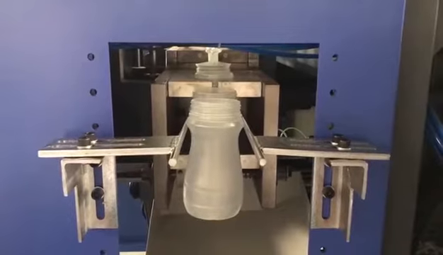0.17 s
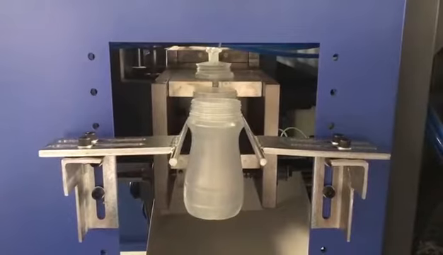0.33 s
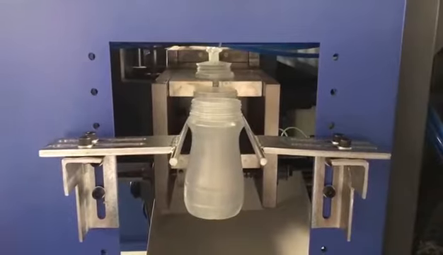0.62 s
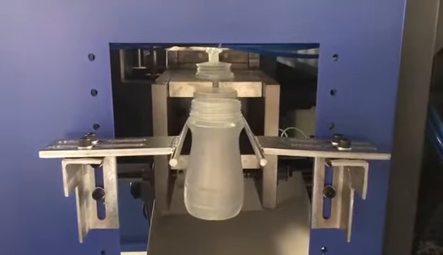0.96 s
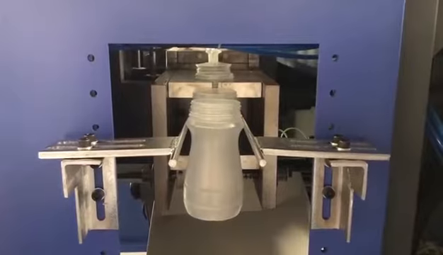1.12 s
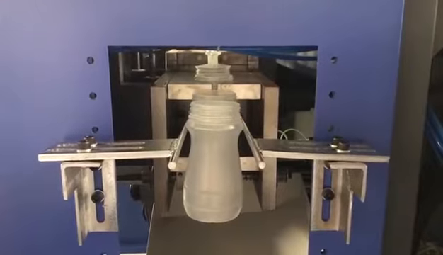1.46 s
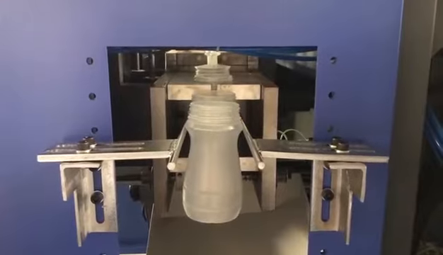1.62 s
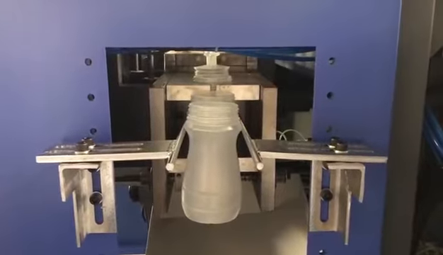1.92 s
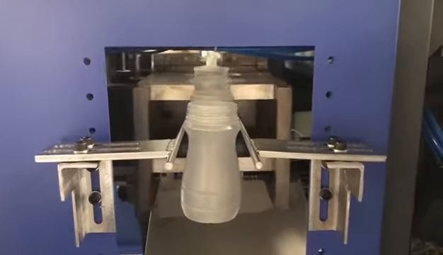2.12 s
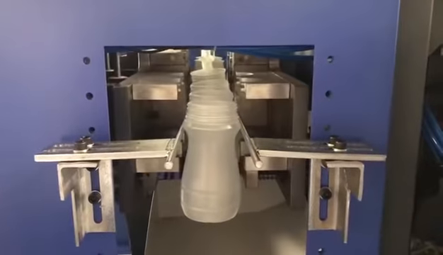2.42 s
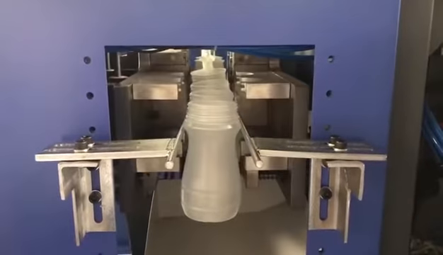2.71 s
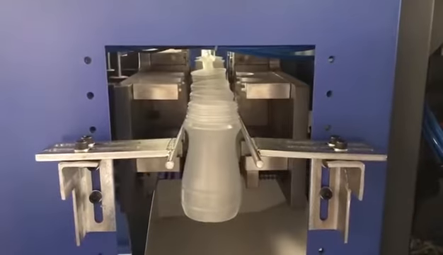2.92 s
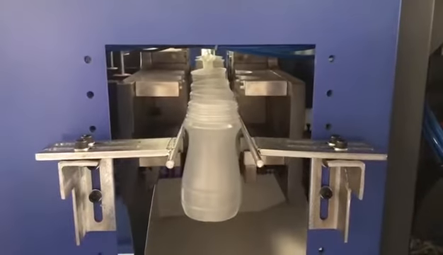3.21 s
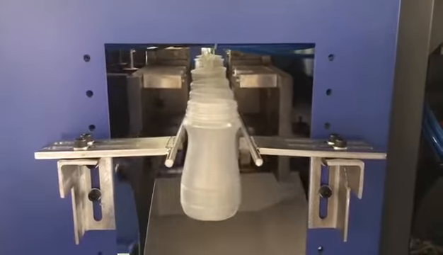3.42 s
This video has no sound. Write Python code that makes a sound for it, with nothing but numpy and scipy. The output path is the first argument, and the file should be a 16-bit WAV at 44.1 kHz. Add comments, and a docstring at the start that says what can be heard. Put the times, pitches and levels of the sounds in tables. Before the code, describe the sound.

Close, mono pickup of a factory moulding machine: constant thin whine over low hum and airy fan, one sharp clack, a brief air vent, a sliding rush into a hard metal slam, then dull knocks and rumble.

```python
"""A motor drive whines steadily over pump hum and fan noise: a blow moulding machine, close up in a hall.
A soft, breathy ring sings along. A latch clacks with a puff of air, a valve ticks and vents, the carriage
slides and slams into its stop, then the mould knocks and the mechanism rumbles on to a late last knock.
Whine and hum are wavering sines; fan, air, slide and rumble are coloured noise. Each blow is a hard
contact and a cluster of small ones that ring a steel part."""
import sys
import numpy as np
from scipy import signal
from scipy.fft import rfft, irfft
from scipy.io import wavfile
from scipy.ndimage import uniform_filter1d, minimum_filter1d

SR = 44100
rng = np.random.default_rng(int(sys.argv[2]) if len(sys.argv) > 2 else 0)


def output_pcm(signal):
    """Save a mono or channel-first signal as 16-bit PCM at the path in sys.argv[1].

    Samples are clipped to [-1, 1] before scaling.
    """
    pcm = np.clip(np.atleast_2d(signal).T, -1, 1) * 32767
    wavfile.write(sys.argv[1], SR, np.round(pcm).astype(np.int16))


N = 157437  # length in samples
TOP_HZ = 7520

WHINE_HZ, WHINE_DB = 4065.2, 1  # centre of the whine, and a trim on all its lines
WHINE_DRIFT, WHINE_FLUTTER_DB = 0.000098, 0.37  # drift as a fraction of the pitch
HUM_DRIFT, HUM_FLUTTER_DB = 0.001483, 1.6
# Drive whine and its sidebands. Each row: offset from the whine's centre in Hz, level in dB before the trim.
WHINE_LINES = [(-131, -55.5), (-65.5, -52.5), (0, -34.5), (65.5, -52.5), (121, -55), (174.5, -61),
               (240.5, -59.5), (361, -62)]
# Pump and motor hum. Each row: frequency in Hz, level in dB.
HUM_LINES = [(151, -56.5), (300.5, -46), (366.3, -40), (551, -56), (652, -54.5), (1787, -56), (3149, -59.5),
             (3386, -56), (5965, -60), (6095, -59.5), (7280, -61)]


def motors():
    """Drive whine with shaft and mains sidebands that drift together; hum lines that waver separately."""
    drift = WHINE_DRIFT * walk(6.7)
    whine = sum(tone(WHINE_HZ + offset, db + WHINE_DB, drift, WHINE_FLUTTER_DB)
                for offset, db in WHINE_LINES)
    hum = sum(tone(hz, db, HUM_DRIFT * walk(20), HUM_FLUTTER_DB) for hz, db in HUM_LINES)
    return whine + hum


# Modes of each struck steel part, listed by part. Each row: frequency in Hz, peak in dB above the broad body.
PART_MODES = { "latch": [(151, 4.5), (1276, 7), (1550, 4), (1895, 6), (2070, 6), (5997, 5)],
              "valve": [(4850, 4)], "stop": [(242, 5), (325, 10), (425, 12), (655, 7), (810, 11.5),
              (1540, 6), (1669, 9), (1771, 5), (2024, 8), (2280, 9), (2976, 11), (3548, 8)],
              "mould": [(323, 9), (624, 10), (1200, 8), (1550, 7), (2280, 6), (2610, 6)]}


def ring(part):
    """Gain over frequency of a steel part's modes; higher ones are wider, so they die sooner."""
    return modes([(hz, 20 + .008 * hz, db) for hz, db in PART_MODES[part]])


RISE_S, BASS_LAG_S = .002, .0015
TAIL_DB, TAIL_S = -22, .055  # hall tail: level against the blow, fall time constant
CONTACTS_PER_S, CONTACT_SHARE = 1400, 0.51  # small contacts; their share of the rattle, the rest is noise
STRIKE_SHARE = .1  # share of a blow's energy in its first hard contact


def blow_force(start, hold, fall):
    """One hard contact, then a rattle of small contacts and noise that falls into a short hall tail."""
    contacts = unit((rng.random(N) < CONTACTS_PER_S / SR) * np.sign(rng.standard_normal(N)))
    grit = rng.standard_normal(N)
    rattle = np.sqrt(CONTACT_SHARE) * contacts + np.sqrt(1 - CONTACT_SHARE) * grit
    tail = undb(TAIL_DB) * envelope(start, RISE_S, hold, TAIL_S)
    env = envelope(start, RISE_S, hold, fall) + tail
    strike = 1. * (np.arange(N) == int((start + RISE_S) * SR))
    force = np.sqrt(STRIKE_SHARE) * unit(strike) + np.sqrt(1 - STRIKE_SHARE) * unit(rattle * env)
    return force * np.sqrt(np.mean(env ** 2))  # longer blows carry more energy


# Blows and their rebounds. Each row: struck part, start in seconds, level in dB, hold in seconds,
# fall time constant in seconds, tilt in dB per octave.
BLOWS = [("latch", .9648, -16, .004, .005, 0), ("latch", .9785, -26, .002, 0.01, 1.2),
         ("valve", 1.2562, -27, .003, .003, .5), ("valve", 1.2645, -29.5, .002, .007, 0),
         ("stop", 2.121, -26, .012, .004, 3), ("stop", 2.135, -17, .003, 0.0049, 1.8),
         ("stop", 2.140, -13, 0.0054, .004, -.3), ("stop", 2.149, -16.5, 0.0034, .006, 0),
         ("stop", 2.165, -28, .003, .036, 0), ("mould", 2.400, -23.5, .005, .006, 1.8),
         ("mould", 2.416, -22.5, .009, .012, -0.39), ("mould", 2.445, -28, .005, .022, -1.8),
         ("mould", 2.524, -32, .006, .016, -1.8), ("mould", 3.213, -34, .012, 0.027, .8)]
# Broad body sound of each struck part, listed by part. Each row: frequency in Hz, relative density in dB per Hz.
PART_BODIES = { "latch": [(40, -22), (150, 1), (400, -1), (560, -7), (1150, -3.5), (2100, -5), (2400, -16),
               (2750, -7), (3300, -22), (6100, -13.5), (7500, -26)], "valve": [(40, -45), (3500, -23),
               (4850, 0), (5600, -8), (7500, -5)], "stop": [(40, -48), (260, -2), (430, 1), (560, -6),
               (760, 1), (1000, -12), (1500, -2.5), (2000, -5), (2600, -8.5), (3400, -9.5), (7500, -25)],
               "mould": [(40, -18), (140, -3), (300, 0), (700, 0), (1200, -4), (1900, -13), (3500, -11.5),
               (7500, -23)]}


def blows():
    """Each force rings its part's broad body and steel modes; the bass arrives slightly later."""
    lag = BASS_LAG_S / (1 + (freqs() / 900) ** 2)
    late = np.exp(-2j * np.pi * np.cumsum(lag) * SR / N)  # summing the delay gives the phase
    steel = {part: ring(part) for part in PART_MODES}
    spectrum = 0
    for part, start, db, hold, fall, tilt_db in BLOWS:
        body = causal(colour(PART_BODIES[part], tilt_db))
        response = unit(body * steel[part])
        spectrum = spectrum + rfft(blow_force(start, hold, fall)) * response * undb(db)
    return irfft(spectrum * late, N)


SPUTTER_DB, SPUTTER_PER_S = 2, 700
# Vented air colour. Each row: frequency in Hz, relative density in dB per Hz.
AIR_COLOUR = [(100, -12), (400, -.5), (1600, -.5), (2400, -3.5), (3500, -1.5), (4800, 3.5), (5300, -1),
              (7000, 3.5), (7600, .5)]
# Air puffs. Each row: start in seconds, level in dB, rise in seconds, hold in seconds,
# fall time constant in seconds, tilt in dB per octave.
AIR_PUFFS = [(0.96, -29, 0.002, 0.0043, 0.015, -1.5), (1.2705, -24, .004, .014, 0.014, 0),
             (2.085, -32, 0.024, 0.0088, .01, -2.2), (2.116, -22, .013, .007, .007, -0.3)]


def valves():
    """Short puffs of compressed air: coloured noise with a fast, sputtering level."""
    out = 0
    for start, db, rise, hold, fall, tilt_db in AIR_PUFFS:
        hiss = noise(colour(AIR_COLOUR, tilt_db))
        sputter = undb(db + SPUTTER_DB * walk(SPUTTER_PER_S))
        out = out + hiss * envelope(start, rise, hold, fall) * sputter
    return out


# Colour of the carriage on its rails. Each row: frequency in Hz, relative density in dB per Hz.
SLIDE_COLOUR = [(60, -10.5), (300, 6.5), (700, -2.5), (1100, -11.5), (1900, -7.5), (3000, -12.5),
                (5000, -13.5), (7500, -12)]
# Slide level over time. Each row: time in seconds, level in dB.
SLIDE_LEVEL = [(2.0, -50), (2.05, -36), (2.115, -28.5), (2.2, -52), (2.37, -39), (2.46, -40), (2.53, -43),
               (2.62, -57), (3.0, -49), (3.28, -41.5), (3.42, -46.5), (3.57, -32.5)]
# Colour of the mechanism's rumble. Each row: frequency in Hz, relative density in dB per Hz.
RUMBLE_COLOUR = [(25, -18.5), (65, 0), (120, 2), (200, 1.5), (330, -8), (520, -12.5), (800, -13.5),
                 (1500, -45)]
# Rumble level over time. Each row: time in seconds, level in dB.
RUMBLE_LEVEL = [(0, -54), (.95, -41.5), (1.05, -40), (2.0, -45), (2.08, -36), (2.2, -39.5), (2.38, -36.5),
                (2.54, -33.5), (2.68, -41), (2.9, -44.5), (3.3, -46.5), (3.38, -31.5), (3.57, -41)]


def carriage():
    """Rail hiss, lightly coloured by the stop's modes, over low rumble; both levels waver."""
    rails = noise(colour(SLIDE_COLOUR) * np.sqrt(abs(ring("stop"))))
    slide = rails * curve(SLIDE_LEVEL) * undb(1.2 * walk(60))
    rumble = noise(colour(RUMBLE_COLOUR)) * curve(RUMBLE_LEVEL) * undb(1.0 * walk(40.03))
    return slide + rumble


# Level of the breathy ring over time. Each row: time in seconds, level in dB.
SING_LEVEL = [(0, -46), (.35, -43.5), (.68, -43), (.85, -51.5), (1.2, -47), (1.6, -56.5), (3.57, -60.5)]


def sing():
    """A soft, breathy ring: noise through a narrow resonance at 895 Hz, applied twice over."""
    return noise(abs(resonance(895, 64)) ** 2) * curve(SING_LEVEL)


HALL_DB, HALL_FLICKER_DB = -36, .5
# Fan and hall noise colour. Each row: frequency in Hz, relative density in dB per Hz.
HALL_COLOUR = [(25, -17), (60, -4), (110, 0.5), (230, -4), (330, -3.5), (470, -4.5), (800, -8),
               (1050, -10.5), (1450, -13), (1900, -15.5), (2450, -14.5), (3200, -13), (4100, -8.5),
               (4550, -21.3), (6000, -21.6), (7500, -21.5)]
# Cabinet panels that colour the fan noise. Each row: frequency in Hz, width in Hz, peak in dB.
PANEL_MODES = [(697, 18, 6.5), (796, 13, 7), (1236, 17, 3), (1750, 37, 6), (1923, 28, 6), (2097, 45, 7.5),
               (2970, 28, 4.5), (4840, 77, 7.5), (5340, 100, 7.5), (5910, 110, 6), (6660, 130, 5)]


def hall():
    """Fan noise, coloured by the cabinet's panels; it flickers slightly."""
    return noise(colour(HALL_COLOUR) * modes(PANEL_MODES)) * undb(HALL_DB + HALL_FLICKER_DB * walk(18))


def undb(db):
    """Decibels to gain."""
    return 10 ** (np.asarray(db) / 20)


def unit(x):
    """Scale to rms 1."""
    return x / np.sqrt(np.mean(abs(x) ** 2))


def curve(points):
    """Gain over time from (s, dB) points."""
    return undb(np.interp(np.arange(N) / SR, *np.array(points).T))


def envelope(start, rise, hold, fall):
    """Straight rise, hold, exponential fall."""
    t = np.arange(N) / SR - start
    return np.clip(t / rise, 0, 1) * np.exp(-np.maximum(t - rise - hold, 0) / fall)


def walk(rate):
    """Smooth random wandering, spread 1, with `rate` fresh values a second."""
    k = int(SR / rate)
    steps = np.repeat(rng.standard_normal(N // k + 1), k)
    return unit(uniform_filter1d(uniform_filter1d(steps, k), k)[:N])


def tone(hz, db, drift, flutter_db):
    """A sine line that wavers in pitch and level."""
    phase = np.cumsum(hz * (1 + drift)) / SR + rng.random()
    level = undb(db + flutter_db * walk(13))
    return np.sqrt(2) * level * np.sin(2 * np.pi * phase)


def freqs():
    """Frequency of each spectrum bin, at least 1 Hz."""
    return np.maximum(np.arange(N // 2 + 1) * SR / N, 1)


def colour(points, tilt_db=0):
    hz, db = np.array(points).T
    octave = np.log2(freqs())
    gain = undb(np.interp(octave, np.log2(hz), db) + tilt_db * octave)
    return gain * (freqs() < 1.1 * TOP_HZ)


def noise(gain):
    """Noise coloured by a gain over frequency, rms 1."""
    return unit(irfft(rfft(rng.standard_normal(N)) * gain, N))


def resonance(hz, width):
    """Response of one mode, gain 1 at its centre."""
    f = freqs()
    return 1 / (1 + 1j * (f * f - hz * hz) / (f * width))


def modes(table):
    """Flat response with a peak added for each (Hz, width in Hz, dB) mode."""
    return 1 + sum((undb(db) - 1) * resonance(hz, width) for hz, width, db in table)


def causal(gain):
    """Give a gain over frequency the phase of a struck body: it rings only after the blow."""
    cepstrum = irfft(np.log(np.maximum(gain / gain.max(), 1e-3)), N)
    first_half = np.arange(N) < N // 2  # folding the cepstrum forward gives minimum phase
    return np.exp(rfft(2 * cepstrum * first_half) - cepstrum[0])


# Level of motors and fan together over time. Each row: time in seconds, level in dB.
RUNNING_LEVEL = [(0, -4.5), (.1, -2.5), (.5, -0.5), (2.7, -0.5), (3.57, 0.8)]


def scene():
    """The whole machine, the same in both ears."""
    running = (motors() + hall()) * curve(RUNNING_LEVEL)
    mono = running + sing() + carriage() + blows() + valves()
    return np.array([mono, mono])


def record(dry):
    """A limiter turns down the loudest peaks, then a steep low-pass cuts the top."""
    ceiling_db, reaction_s = -5.5, 0.011
    size = int(reaction_s * SR)
    headroom = np.minimum(1, undb(ceiling_db) / np.maximum(abs(dry), 1e-9))
    limited = dry * uniform_filter1d(minimum_filter1d(headroom, size), size)
    low_pass = signal.ellip(14, .2, 80, TOP_HZ, fs=SR, output="sos")
    return signal.sosfilt(low_pass, limited)


dry = scene()
out = record(dry)
output_pcm(out)
```